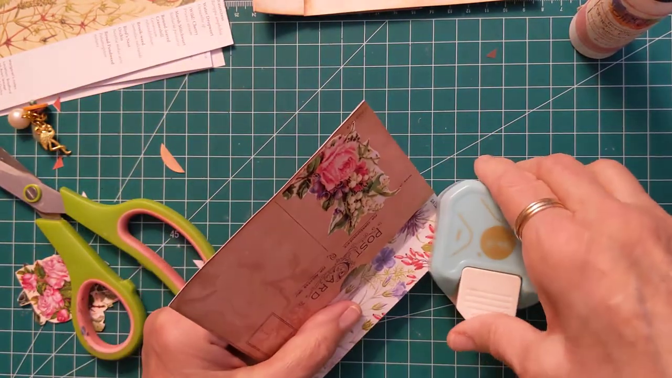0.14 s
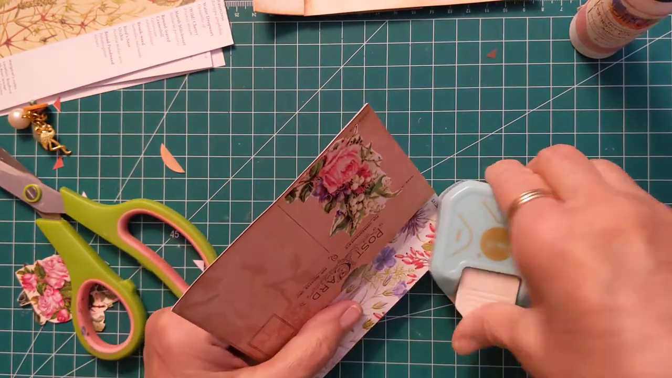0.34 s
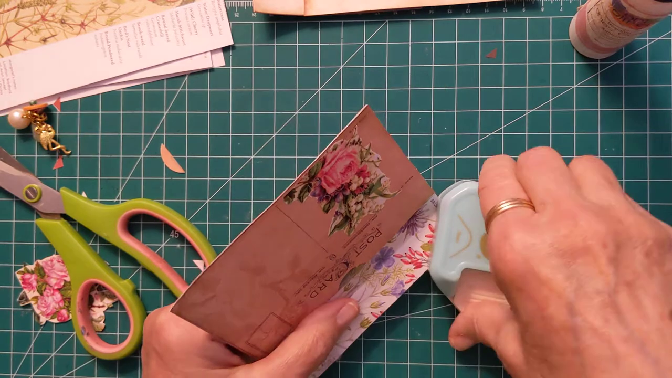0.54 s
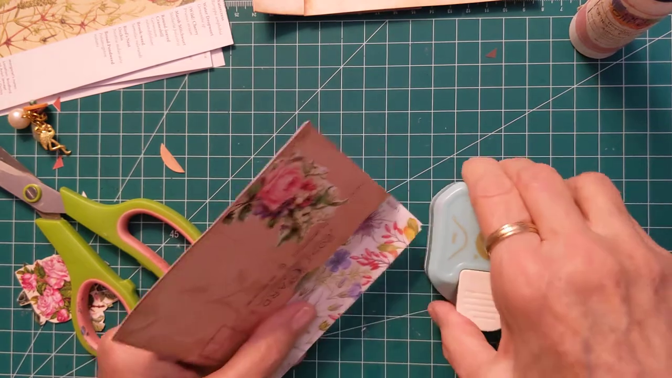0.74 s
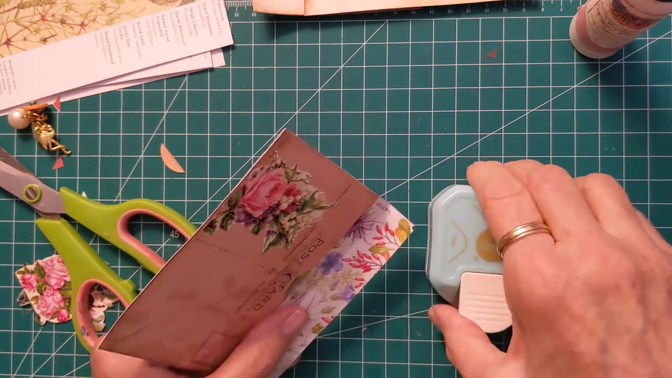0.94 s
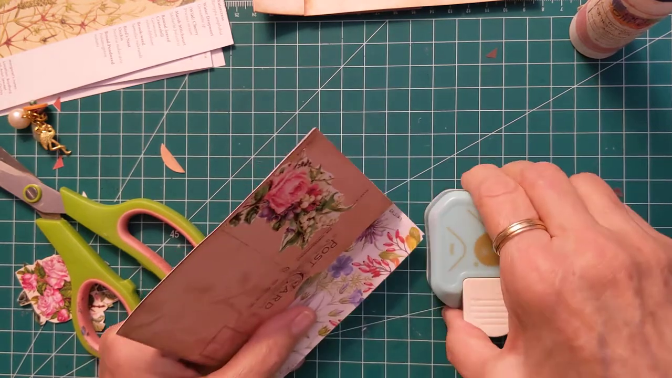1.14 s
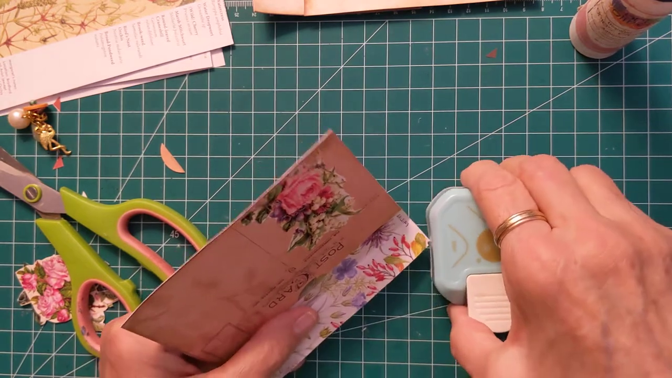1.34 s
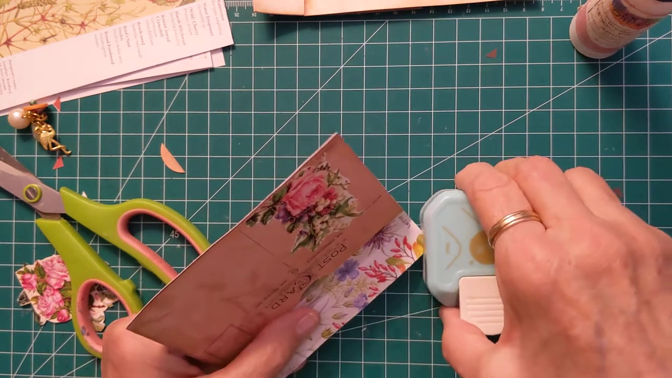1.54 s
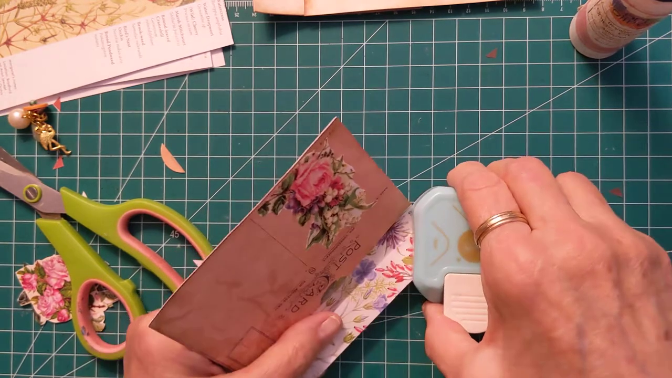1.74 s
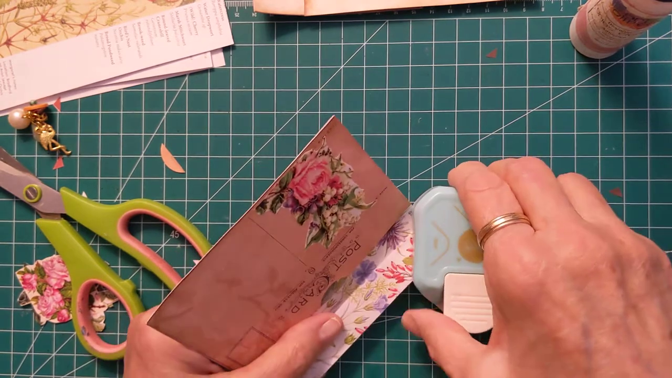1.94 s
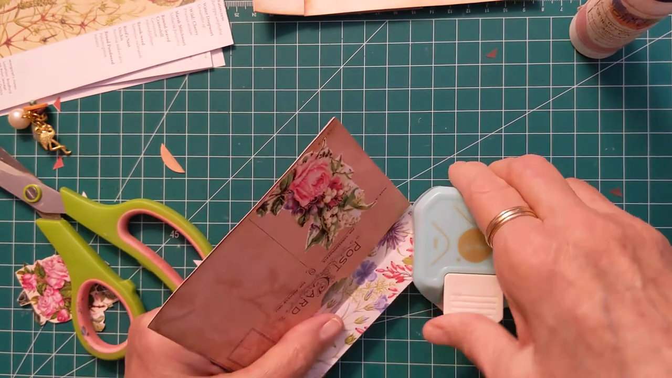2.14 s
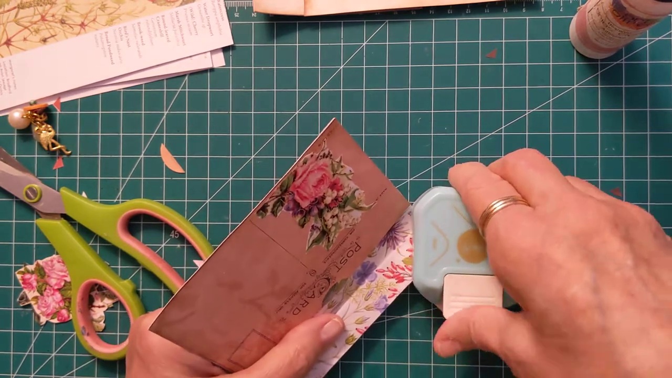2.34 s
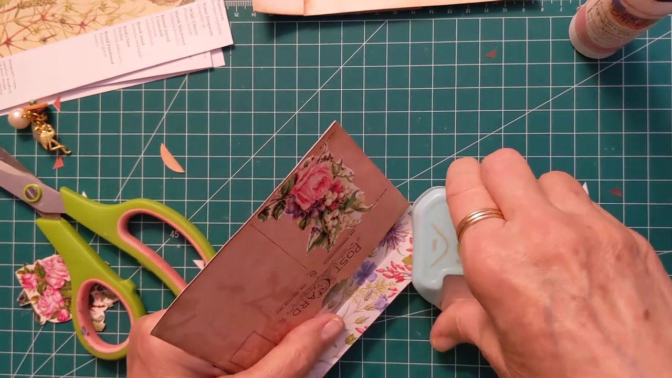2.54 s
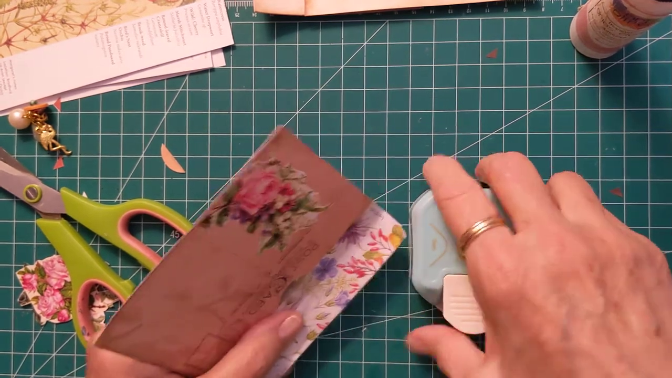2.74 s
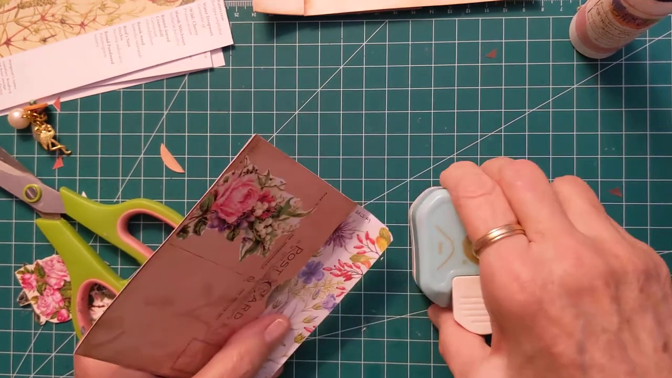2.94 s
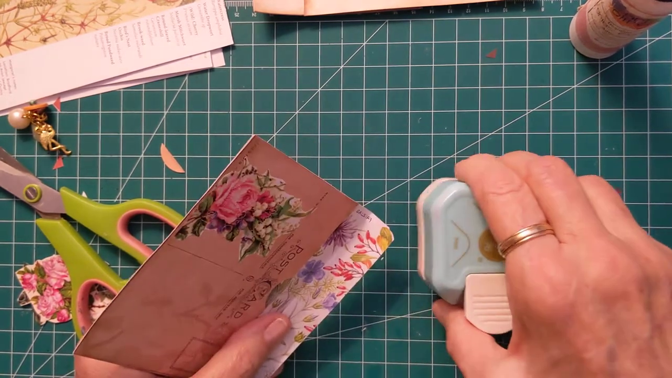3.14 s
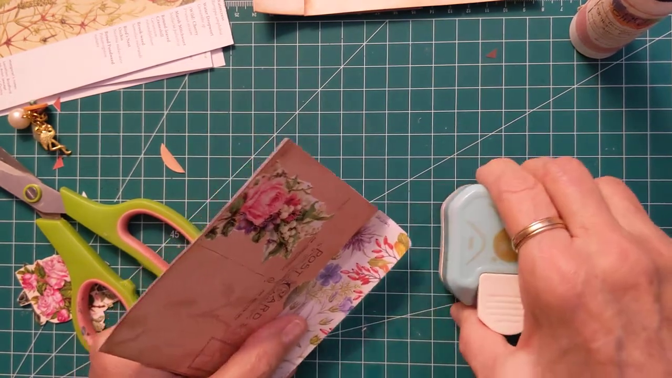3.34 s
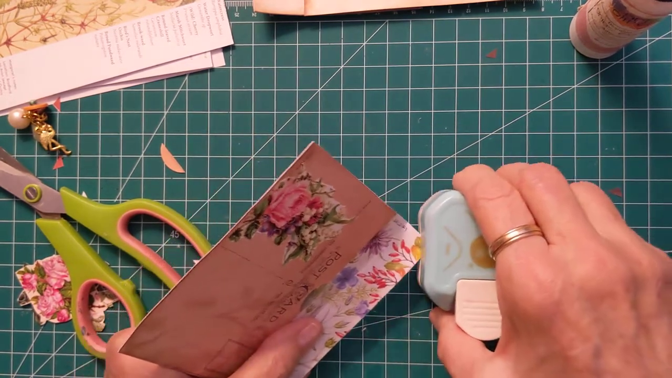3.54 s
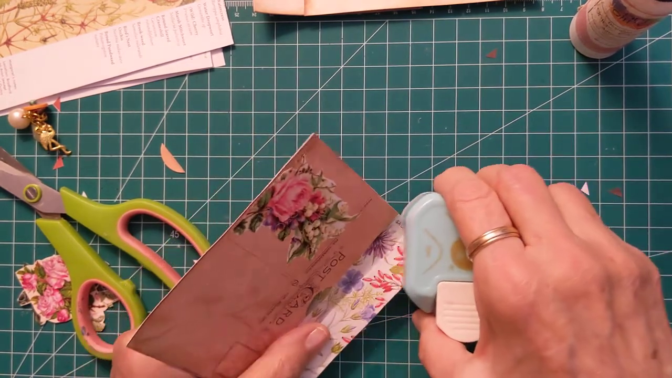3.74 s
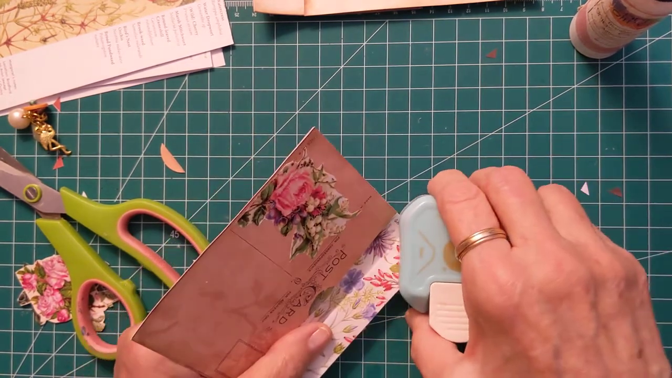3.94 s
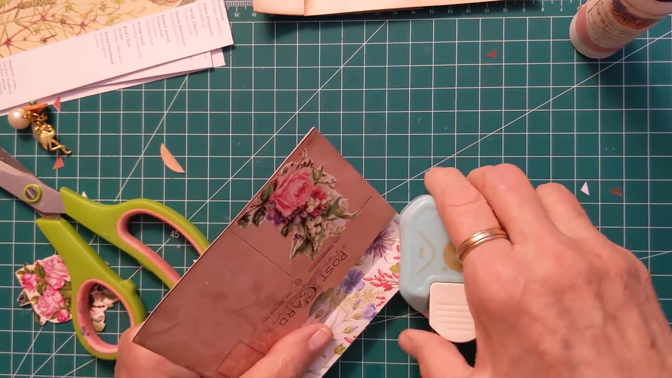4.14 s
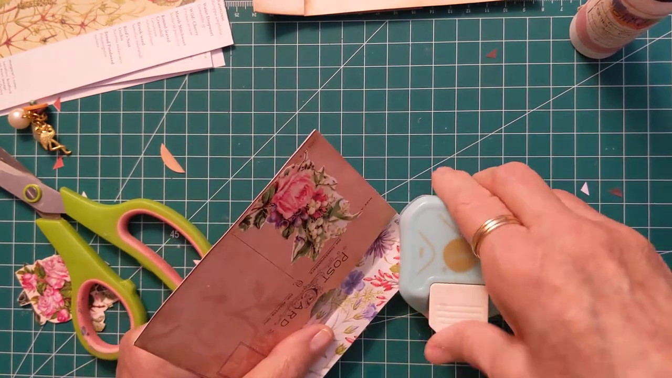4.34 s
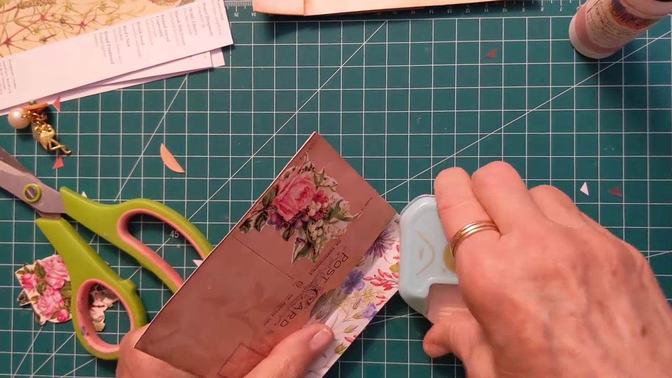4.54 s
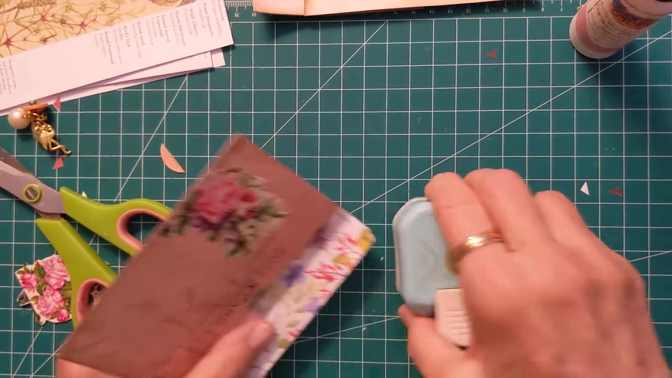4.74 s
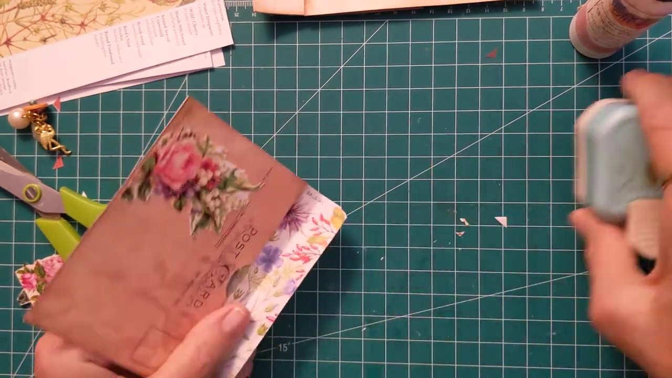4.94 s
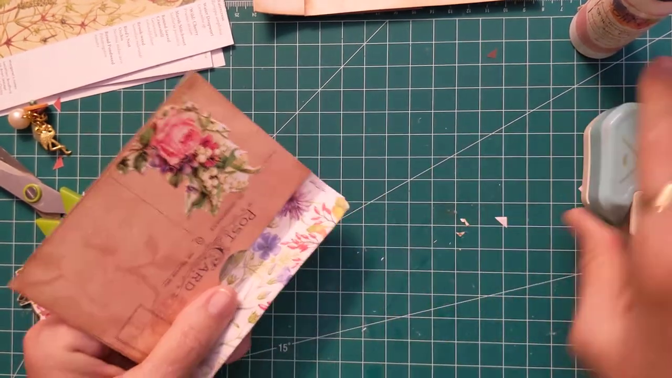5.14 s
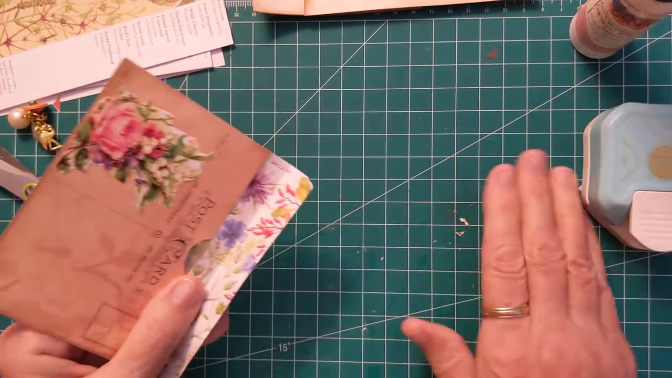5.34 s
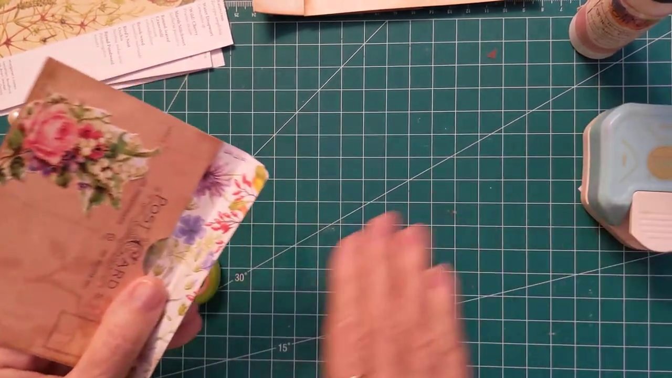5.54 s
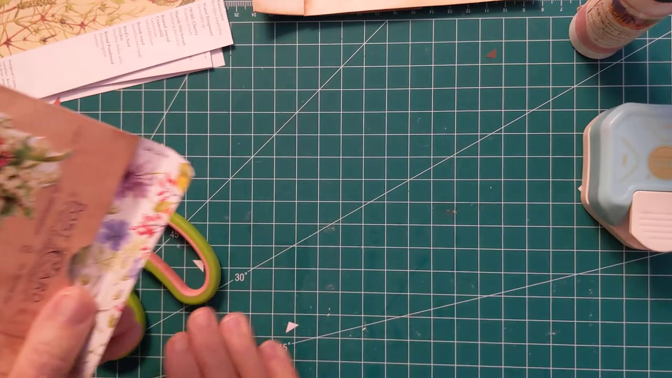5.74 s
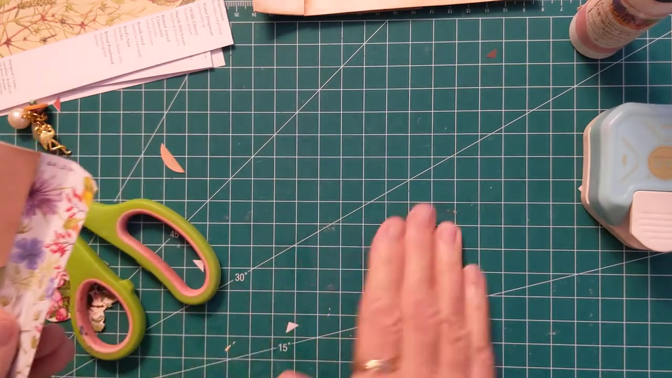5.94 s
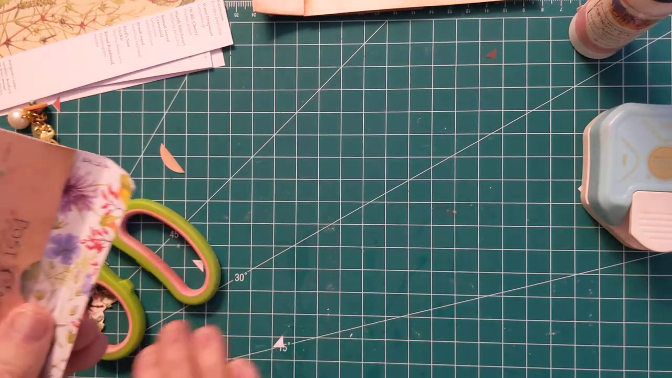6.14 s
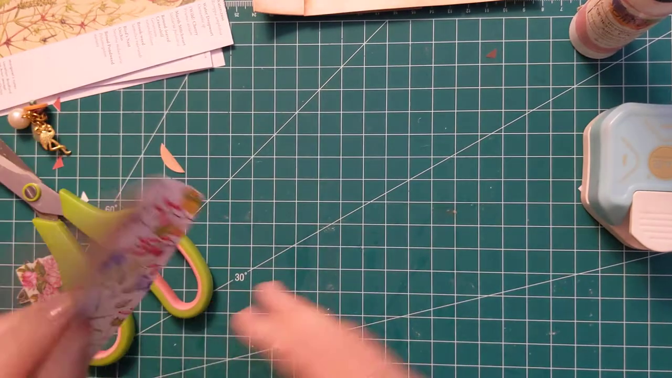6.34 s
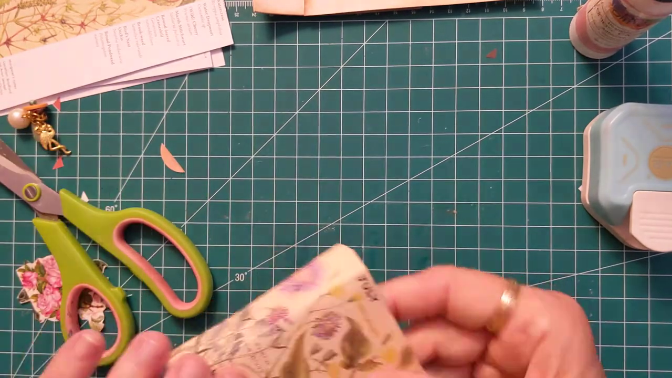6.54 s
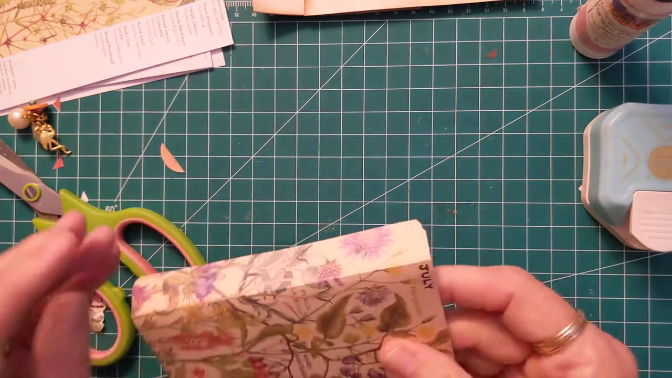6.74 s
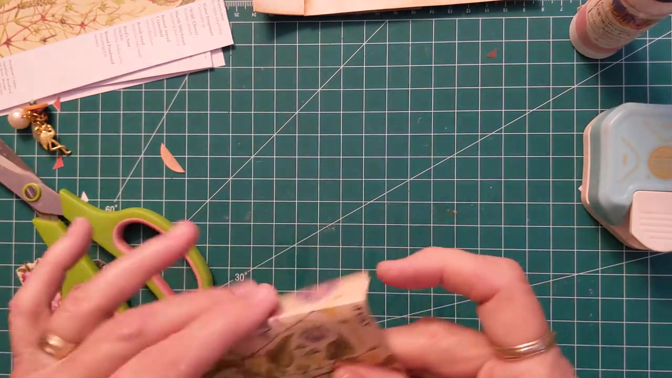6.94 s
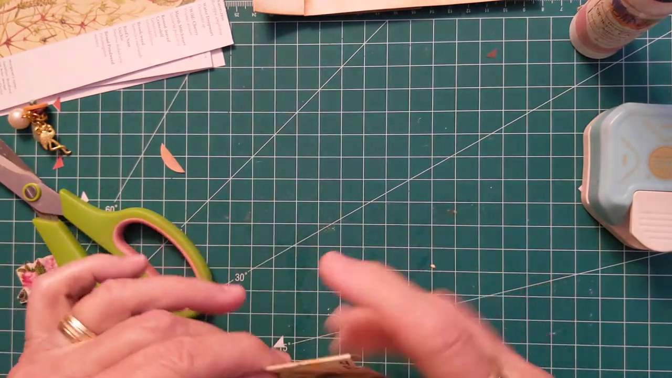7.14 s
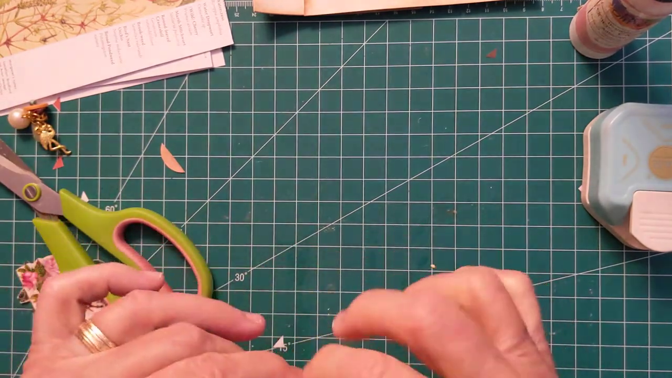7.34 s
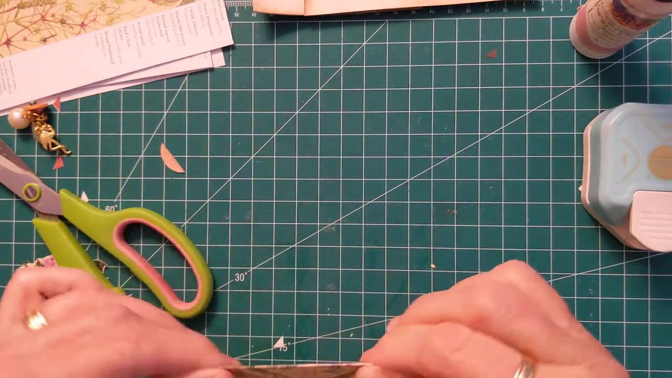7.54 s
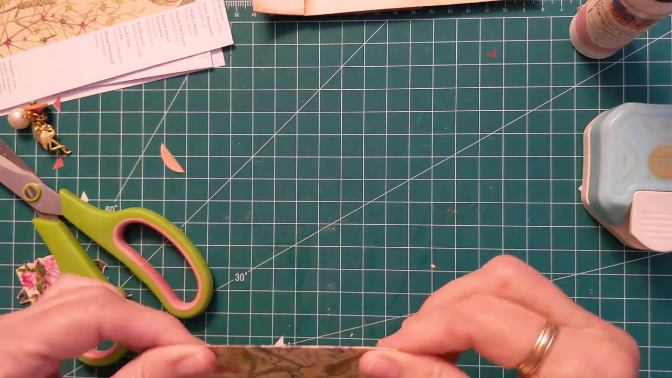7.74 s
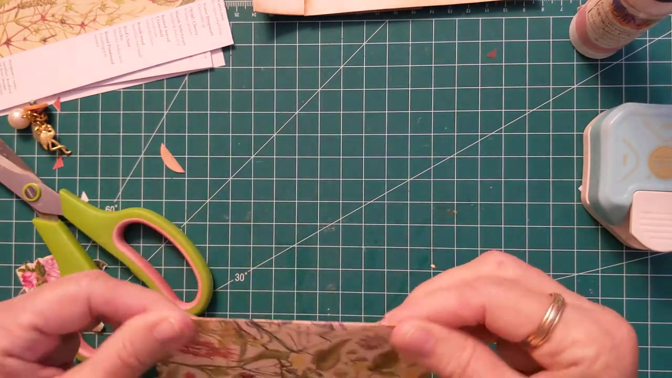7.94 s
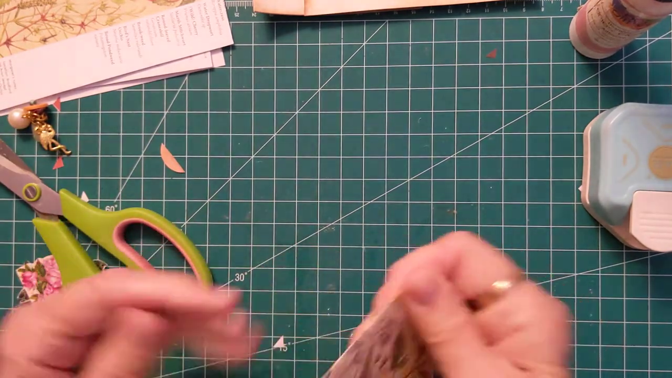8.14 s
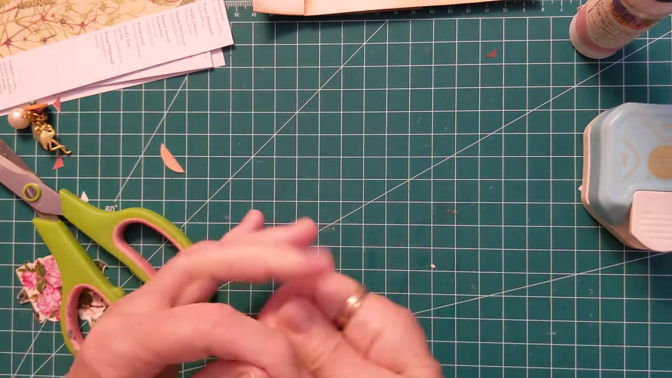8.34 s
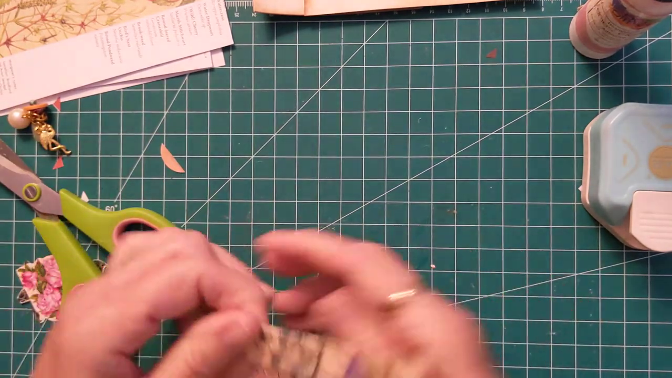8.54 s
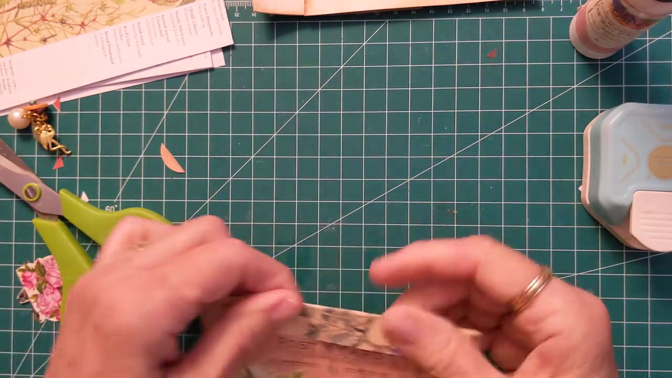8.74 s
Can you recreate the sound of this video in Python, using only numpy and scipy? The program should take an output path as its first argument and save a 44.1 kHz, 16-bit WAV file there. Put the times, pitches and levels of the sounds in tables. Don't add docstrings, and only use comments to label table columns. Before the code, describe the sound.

A lever corner punch snaps through thick paper three times over a quiet fan hum, then a palm sweeps scraps and folded paper crackles.

```python
import sys
import numpy as np
from scipy import signal
from scipy.fft import rfft, irfft
from scipy.io import wavfile
from scipy.ndimage import uniform_filter1d

SR = 44100
rng = np.random.default_rng(int(sys.argv[2]) if len(sys.argv) > 2 else 0)


def master_out(mix):
    frames = np.transpose(np.atleast_2d(mix))
    ceiling = np.clip(frames, -1, 1)
    pcm = np.round(ceiling * 32767).astype(np.int16)
    wavfile.write(sys.argv[1], SR, pcm)


def nominal_scale(level):
    x = np.asarray(level, float) / 20
    return 10 ** x


N = 391608


def rms_one(x):
    return x / np.sqrt(np.mean(x ** 2) + 1e-20)


def at_hz(points, hz):
    curve_hz, value = np.array(points).T
    return np.interp(np.log(hz), np.log(curve_hz), value)


def drift(rate_hz):
    r = np.exp(-80 * np.pi * rate_hz / SR)
    slow = signal.lfilter([1], [1, -2 * r, r * r], rng.standard_normal(N // 40 + 2002))[2000:]
    return np.interp(np.arange(N) / 40, np.arange(len(slow)), rms_one(slow))


# pitch_hz, likeness (1 = the same)
LIKENESS = [(60, 0.98), (130, 0.98), (290, 0.89), (640, 0.54), (1410, 0.36), (3100, -0.016), (6820, 0.041),
            (15000, 0.073)]


def coloured(white, spectrum, peaks=()):
    hz = np.maximum(np.fft.rfftfreq(N, 1 / SR), 1)
    db = at_hz(spectrum, hz)
    for peak_hz, width_hz, top_db in peaks:
        db = db + top_db / (1 + (2 * (hz - peak_hz) / width_hz) ** 2)
    alike = np.clip(at_hz(LIKENESS, hz), 0, 1)
    mid, side = rfft(white) * nominal_scale(db)
    return rms_one(irfft(np.sqrt(1 + alike) * mid + np.sqrt(1 - alike) * side * [[1], [-1]], N))


def ring(modes, lean_db, detune, turn):
    hz, db, t60_s = np.transpose(modes)[:, :, None]
    t = np.arange(round(min(t60_s.max(), 1 / 6) * SR)) / SR
    sines = np.sin(2 * np.pi * hz * detune * t + turn * [[[1]], [[-1]]])
    sines *= nominal_scale(db - 60 * t / t60_s)
    sines *= 1 - np.exp(-t * hz / 0.31)
    flip = (-1) ** np.arange(len(hz))[:, None]
    sines *= np.where(hz > 2700, flip, 1)
    return np.sum(nominal_scale(lean_db)[:, :, None] * sines, axis=1)


GRIT_REACH_DB = (-9, 5, 3.5, 6)
SHELL_DB, PORT_TURN_RAD = 3.5, 0.9


def contacts(events, bodies, grit_db, vary_db, slack, unlike=(.12, .25, .62, .9), soft_ms=0):
    out, k = np.zeros((2, N + SR)), np.arange(900)
    push = np.hanning(3 + round(soft_ms * SR / 1000))[1:]
    draw = rng.standard_normal((len(events), 4, 3, 900))
    for (s, db, table_db, blade_db, edge_db, ms), chance in zip(events, draw):
        fade = np.exp(-k / (max(ms, .1) * SR / 1000))
        levels_db = table_db, SHELL_DB, blade_db, edge_db
        groups = zip(bodies, unlike, GRIT_REACH_DB, levels_db, chance)
        for modes, share, reach_db, body_db, (a, b, c) in groups:
            hail = np.array([a, b]) * np.abs(c) * nominal_scale(grit_db + reach_db) * fade
            hail[0, 0] = -1
            hail = signal.lfilter(push, 1, hail)
            m = len(modes)
            lean_db = vary_db * a[-m:] + 1.5 * share * b[-m:] * [[1], [-1]]
            turn = PORT_TURN_RAD * share ** 2 * a[-2 * m:-m, None]
            body = ring(modes, lean_db, 1 + slack * c[-m:, None], turn)
            body = signal.sosfilt(signal.butter(2, .75 * modes[0][0], "high", fs=SR, output="sos"), body)
            sound = signal.fftconvolve(hail[0] + share * hail[1] * [[1], [-1]], body, axes=1)
            peak = np.abs(sound).max(axis=1).mean()
            start = round(s * SR)
            out[:, start:start + sound.shape[1]] += nominal_scale(db + body_db) / peak * sound
    return out[:, :N]


def lasting(rows, ms):
    return [(*row, ms) for row in rows]


def staged(events, stages):
    rows = []
    for s, extra_db, *levels in events:
        for db, (after_ms, weight_db, blade_db, edge_db, ms) in zip(levels, stages):
            rows.append((s + after_ms / 1000, db, weight_db, blade_db, edge_db + extra_db, ms))
    return rows


def strokes(rows, roundness, pan_db, pan_db_per_s=0):
    out, t = np.zeros((2, 2, N)), np.arange(N) / SR
    for s, db, rise_s, fall_s, grain_db in rows:
        near = slice(max(round((s - 3 * rise_s) * SR), 0), round((s + 3 * fall_s) * SR))
        u = t[near] - s
        level_db = db - 20 * np.abs(u / np.where(u < 0, rise_s, fall_s)) ** roundness
        gain = nominal_scale(level_db + (pan_db + pan_db_per_s * u) * [[.5], [-.5]])
        out[:, :, near] += [gain, gain * nominal_scale(grain_db)]
    return out


# pitch_hz, width_hz, level_db
RUMBLE = [(8.8, -42), (15, -9.5), (43, -1), (65, -11.5), (112, -10.5), (173, -11.5), (238, -19.5),
          (258, -21), (362, -20.5), (399, -29), (432, -18.5), (516, -21), (700, -23), (910, -18.5),
          (1540, -120)]
FAN = [(350, -51), (600, -8.5), (858, -9.5), (894, -4.5), (1030, 1), (1210, -9), (1390, -3), (1590, -12),
       (1930, -8), (2120, -8.5), (2240, -7.5), (5560, -16.5), (7110, -23.5), (10500, -20), (15750, -31.5),
       (15950, -62)]
FAN_PEAKS = [(1060, 600, 0), (1452, 240, 6.5), (1895, 245, 6.5), (2140, 55, -7.5)]


def fan():
    air = coloured(rng.standard_normal((2, N)), FAN, FAN_PEAKS) * nominal_scale(-55 + .5 * drift(3.3))
    return air + coloured(rng.standard_normal((2, N)), RUMBLE) * nominal_scale(-57)


# fastest_s, hiss_db, rise_s, fall_s, grain_db (re hiss)
SCUFFS = [(.401, -66.5, 0.17, 0.018, 6.5), (.653, -60, 0.087, .02, 6), (.666, -45, 0.0083, 0.028, 4.5),
          (.712, -64, .03, 0.37, 1), (1.778, -59, 0.14, 0.087, 3), (2.422, -76, 0.21, .02, 10),
          (2.441, -51, 0.018, 0.0049, 10), (2.692, -58.5, 0.03, .15, 2), (2.788, -59, 0.1, 0.011, 7),
          (2.806, -68, .02, 0.22, -12), (3.777, -67.5, 0.22, .27, 5.5), (4.454, -67, 0.08, .005, 9),
          (4.671, -56, 0.046, 0.08, 0), (4.753, -60, .08, 0.039, -6), (4.8, -72, .03, .36, -14),
          (5.072, -46, 0.0093, 0.022, -1), (5.11, -67, .02, 0.48, 2.2)]


def scuffs():
    return strokes(SCUFFS, roundness=0.99, pan_db=-1)


# start_s, level_db, blade_db, edge_db, length_ms
CUTS = [
    (0.4100, -39, -2, 2, 1.5),
    (0.4130, -26, 11, 5, 0.8),
    (0.4145, -26, 11, 6, 1.6),
    (2.4455, -42, 2, -7, 6.3),
    (2.4512, -40, 5, -5, 10),
    (2.4606, -34, 7, 3, 3),
    (2.4648, -30, 7, 5, 1.5),
    (4.4608, -41, 2, 0, 2.2),
    (4.4635, -28, 3, 4, 3.5),
]
# pitch_hz, level_db, t60_s
TABLE = [(108, -1, 0.083), (156, -5, 0.05), (222, 5, 0.05), (294, -5, 0.04), (425, -3, 0.035),
         (560, 7, 0.005)]
BITING = [(820, -6.5, 0.015), (1160, -16, 0.0041), (1450, -3, 0.013), (1790, 4.5, 0.0071),
          (2310, 2.5, 0.0077), (2770, -3, 0.002)]
BLADE = [(2980, -4.5, 0.003), (3300, -6, 0.0051), (3960, -2, 0.0043), (4410, -7.5, 0.0091),
         (4590, -4, 0.009), (4900, 0.5, 0.0034), (5080, -6, 0.0068), (5570, -7, 0.0038),
         (7120, -15.5, 0.0097), (7430, -9.5, 0.0026)]
EDGE = [(8540, 6, 0.002), (9720, 3, 0.0055), (10800, 5, 0.0032), (12000, 6.5, 0.0023), (13200, 3, 0.0033),
        (14800, -3.5, 0.0021), (15200, -4, 0.0015)]


def cuts():
    table_db = -8
    rows = [(s, db, table_db, *rest) for s, db, *rest in CUTS]
    return contacts(rows, (TABLE, BITING, BLADE, EDGE), -8, vary_db=1.5, slack=.02)


# start_s, extra_edge_db, stop_db, rebound_db, second_rebound_db
SNAPS = [
    (.4186, 2.5, -15, -30, -36),
    (2.4713, 6, -14, -30, -36),
    (4.4695, 4, -14, -31, -35),
]
# after_ms, weight_db (on the table), blade_db, edge_db, length_ms
SNAP_STAGES = [
    (0, -7, -4, -5, 0.5),
    (1.6, -4, 8, 6, 1.7),
    (9.3, -8, -2, -4, 4),
]
# pitch_hz, level_db, t60_s
SHELL = [(797, -12, 0.027), (1145, -6, 0.01), (1330, -25, 0.026), (1494, -13, 0.048), (1592, 3, 0.014),
         (1700, -19, 0.016), (1853, -20, 0.075), (2100, -14, 0.0074), (2360, -17, 0.044)]


def snaps():
    return contacts(staged(SNAPS, SNAP_STAGES), (TABLE, SHELL, BLADE, EDGE), -15,
                    vary_db=.6, slack=.004, unlike=(.12, .25, .45, .8))


# start_s, level_db, weight_db, blade_db, edge_db
TAPS = [(.5434, -55, -14, 9, -24), (.6079, -41, -27, 5.5, 2), (.626, -52, 5, -8, -12),
        (2.4246, -43, -19, 8, 6), (2.6902, -47.5, -4, -1, 6), (2.7804, -43, 1, 6, -3),
        (2.7915, -49.5, 10, 8, 3), (3.546, -48, -18, 4.5, -13), (3.8906, -53.5, -1, 8, 9),
        (4.4525, -41, -17, -4, -17), (4.6329, -53, -8, 6, 10), (4.6485, -43, -21, 12.5, 9.5),
        (4.674, -56, -22, -3, -5), (4.6915, -45, -2, 3, 8), (4.714, -49, 1, -1.2, -2.2),
        (4.7444, -41.5, -26, -1, -9), (4.7549, -47, -28, 8, 5), (4.8217, -45, -18, -17, -22),
        (4.8398, -47, -6, -17, -12), (5.073, -49, -19, 3, 10), (5.0919, -37.5, -27, -8, -8)]
# pitch_hz, level_db, t60_s
LOOSE = [(1070, 16, 0.011), (1490, 15, 0.0042), (1670, -22, 0.0032), (1960, 11, 0.0058), (2440, -6, 0.011)]
LEVER = [(2900, -1, .005), (3600, 0, .006), (4200, -3, .004), (4900, -2, .004), (5600, -3, .004),
         (6600, -7, .003), (7500, -7, .003)]


def taps():
    return contacts(lasting(TAPS, ms=2.7), (TABLE, LOOSE, LEVER, EDGE), -13, vary_db=1.5, slack=.03)


# start_s, extra_edge_db, slack_db, catch_db, rebound_db
RELEASES = [
    (.6632, 0.5, -40, -30.5, -54),
    (2.7455, 1.5, -41.5, -29, -45),
    (4.6806, 0.5, -40, -24.5, -44),
]
# after_ms, weight_db, blade_db, edge_db, length_ms
RELEASE_STAGES = [
    (-10, -15, 3, -4, 3),
    (.3, -9, 6, 8, 1.5),
    (9, -6, 3, 4, 5),
]
# pitch_hz, level_db, t60_s
SPRUNG = [(1090, 3, 0.0086), (1440, 0.5, 0.0054), (1760, -4, 0.0035), (2050, -8, 0.0066),
          (2510, -11.5, 0.008)]
CATCH = [(9200, 2, 0.0023), (10830, 4, 0.0049), (12660, 3.5, 0.0019), (11250, -4, 0.0028),
         (13400, -16, 0.0015), (14700, -5, 0.0018), (15700, -18, 0.0015)]


def releases():
    return contacts(staged(RELEASES, RELEASE_STAGES), (TABLE, SPRUNG, LEVER, CATCH), -17, vary_db=1.0, slack=.02)


# start_s, level_db, weight_db, blade_db, edge_db
THUDS = [
    (.6913, -31.5, -3.5, -30, -25),
    (2.7733, -29, -4.5, -30, -25),
    (3.904, -38, -4.5, -22, -20),
    (5.0668, -36.5, -4, -20, -20),
    (5.0772, -44, -1, -20, -20),
    (5.0806, -35, -14, -20, -20),
    (5.0833, -26, -13.5, -20, -6.5),
]
# pitch_hz, level_db, t60_s
BASE = [(500, -3, 0.007), (740, -1, 0.011), (960, 0, 0.009), (1180, -6, 0.01), (1400, -9, .012)]


def thuds():
    return contacts(lasting(THUDS, ms=.3), (TABLE, BASE, BLADE, EDGE), -20,
                    vary_db=1.0, slack=.03, soft_ms=0.6)


# start_s, level_db, weight_db, blade_db, edge_db
TICKS = [
    (1.3813, -40.5, -26, 0, -6),
    (3.8359, -34.5, -31, -0.5, -13),
    (3.8627, -36.5, -18, -12, -12),
]
# pitch_hz, level_db, t60_s
CORNER = [(795, -4.5, 0.01), (1480, -5, 0.0045), (1930, 3.5, 0.0078), (2460, -2, 0.0086)]


def ticks():
    return contacts(lasting(TICKS, ms=.35), (TABLE, CORNER, LEVER, EDGE), -16, vary_db=1.0, slack=.02)


# start_s, level_db, weight_db, blade_db, edge_db
NUDGES = [
    (1.3832, -40, -26, -12, -20),
    (1.7836, -33, -18, -5, -25),
    (1.7918, -43, -9, -15, -20),
]
# pitch_hz, level_db, t60_s
MOUTH = [(780, -3.5, 0.014), (1390, -2.5, 0.014), (1490, -11, 0.0074), (2450, -3, 0.0063)]


def nudges():
    return contacts(lasting(NUDGES, ms=.35), (TABLE, MOUTH, LEVER, EDGE), -16, vary_db=1.0, slack=.02)


# fastest_s, hiss_db, rise_s, fall_s, grain_db
SLIPS = [(5.4, -63, .02, 0.1, -3), (5.9, -77, 0.11, 0.2, 10), (6.3, -74, 0.036, .3, -1.2),
         (6.55, -65, 0.31, .03, 5), (6.574, -51.5, .004, .05, -4), (6.643, -46, 0.018, 0.0099, -4),
         (6.78, -69, .04, 0.19, 5), (7.38, -59, 0.24, 0.12, 0), (7.86, -58, 0.077, .1, -7),
         (8.139, -37, 0.028, 0.02, -8), (8.19, -61, .04, 0.32, -5), (8.533, -40, 0.024, 0.027, -9),
         (8.47, -68, 0.055, .05, 11), (8.838, -48, 0.019, 0.064, -9)]


def slips():
    return strokes(SLIPS, roundness=0.5, pan_db=2)


# fastest_s, hiss_db, rise_s, fall_s, grain_db
SWEEPS = [
    (5.49, -57, 0.061, 0.076, 1.5),
    (5.58, -42, 0.14, 0.16, -12),
    (5.71, -45.5, 0.072, 0.12, -13.5),
    (6.04, -49, 0.021, 0.043, -18),
    (6.11, -38.5, 0.074, 0.16, -10),
    (7.53, -44.5, 0.095, 0.15, -17),
]


def sweeps():
    return strokes(SWEEPS, roundness=2.1, pan_db=-1.5, pan_db_per_s=11)


# start_s, level_db, weight_db, blade_db, edge_db
FLICKS = [(6.5721, -46.5, 3, -2, -5), (6.632, -45.5, -1, 4, 13), (6.6875, -46, -2.5, -12, -5),
          (6.7372, -49.5, -7, 7, -3), (6.7398, -48, 0, 14, 3), (6.9344, -49, 6, -8, -1),
          (7.8776, -55, -17, -12, 11), (8.1268, -58, -10.5, 2, 13), (8.1388, -42.5, 2, 10.5, 8),
          (8.1425, -52, 13, -6, -8), (8.1444, -50, 15, -10, -5), (8.3764, -55, -10.5, 4, 7),
          (8.5325, -55, -2, 12, 21), (8.8265, -43.5, -6, -1, -1), (8.8327, -46.5, -3, 7, 16)]
# pitch_hz, level_db, t60_s
SHEET = [(500, -6, 0.025), (600, 0, 0.024), (770, -2, 0.014)]
CREASE = [(3180, -9, .004), (4020, -5, 0.005), (4700, 1, 0.011), (5500, -3, 0.008), (6600, -8, 0.004),
          (7400, -7, 0.0025)]


def flicks():
    return contacts(lasting(FLICKS, ms=1), (SHEET, LOOSE, CREASE, EDGE), -13, vary_db=1.5, slack=.015)


# fastest_s, hiss_db, rise_s, fall_s, grain_db
WIPES = [
    (6.695, -49.5, 0.022, 0.031, -8),
    (6.735, -52.5, 0.019, .025, -4),
    (6.98, -50.5, 0.047, 0.14, -5.5),
    (7.13, -55, 0.016, 0.026, -6),
    (7.175, -58.5, 0.023, 0.016, -6),
    (7.29, -53, 0.019, 0.042, -13),
    (7.76, -55.5, 0.052, 0.055, -7.5),
    (7.97, -58.5, 0.084, 0.12, -3.5),
]


def wipes():
    return strokes(WIPES, roundness=2.8, pan_db=-0.5)


def grains(spread_db):
    return rng.standard_normal((2, N)) * nominal_scale(spread_db * np.minimum(rng.exponential(1, N), 5))


# pitch_hz, level_db (per Hz)
RUB_HIGH = [(4120, -22.5), (7000, -12.5), (7630, -15), (9690, -5), (10200, -3), (13600, -6), (15700, -12),
            (16200, -49)]
RUB_LOW = [(700, -13.5), (1500, -6.5), (2500, -4), (4500, -3), (6500, -10.5), (8000, -21), (9500, -45)]
JUDDER_HZ, JUDDER_DB, JUDDER_START_S, JUDDER_END_S = 39, -0.5, 5.5, 6.3


def rubbing():
    hiss, low = uniform_filter1d(scuffs() + slips() + sweeps() + wipes(), size=120)
    t = np.arange(N) / SR - JUDDER_START_S
    dragging = (t > 0) & (t < JUDDER_END_S - JUDDER_START_S)
    judder_db = JUDDER_DB * np.cos(2 * np.pi * JUDDER_HZ * t) * dragging
    flicker = nominal_scale(0.78 * drift(29) + 0.5 * drift(230) + judder_db)
    return flicker * (low * coloured(grains(1.5), RUB_LOW) + hiss * coloured(grains(1.0), RUB_HIGH))


# pitch_hz, t60_s
ROOM = [(300, 0.11), (1500, 0.18), (4000, 0.21), (11000, 0.2)]
ROOM_DB, WALL_MS = -11.5, 4.9


def room(x):
    t = np.arange(SR // 3) / SR
    edges_hz = [60, 700, 2600, 6500, 17000]
    tail = np.zeros((2, len(t)))
    for low, high, (_, t60_s) in zip(edges_hz, edges_hz[1:], ROOM):
        band = signal.butter(2, [low, high], "band", fs=SR, output="sos")
        tail += signal.sosfilt(band, rng.standard_normal((2, len(t)))) * nominal_scale(-60 * t / t60_s)
    tail[1] = 0.11 * tail[0] + 1.27 * tail[1]
    tail /= np.sqrt(np.sum(tail ** 2) / 2)
    tail = np.pad(tail, ((0, 0), (round(WALL_MS * SR / 1000), 0)))
    return nominal_scale(ROOM_DB) * signal.fftconvolve(x.mean(axis=0, keepdims=True), tail)[:, :N]


def scene():
    near = cuts() + snaps() + taps() + releases() + thuds() + ticks() + nudges() + flicks()
    near[1] = np.roll(near[1], 1)
    return near + room(near) + rubbing() + fan()


# pitch_hz, level_db
PORT_BALANCE = [(60, 1.5), (300, 0.5), (700, 1.5), (1400, 0), (3000, 2.5), (6000, 3), (9000, -2),
                (15000, -2.5)]


def ports(x):
    lean_db = at_hz(PORT_BALANCE, np.maximum(np.fft.rfftfreq(N, 1 / SR), 1))
    return irfft(rfft(x) * nominal_scale(lean_db * [[.5], [-.5]]), N)


def band_limit(x):
    return signal.sosfilt(signal.butter(12, 17150, fs=SR, output="sos"), x)


def record(dry):
    top_cut = signal.cheby2(10, 50, 17200, fs=SR, output="sos")
    return band_limit(signal.sosfilt(top_cut, ports(dry)))


dry = scene()
out = record(dry)
master_out(out)
```